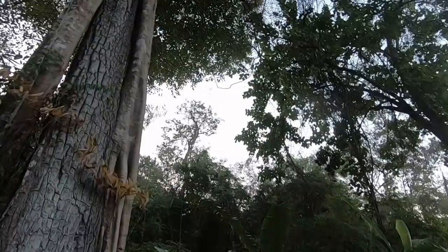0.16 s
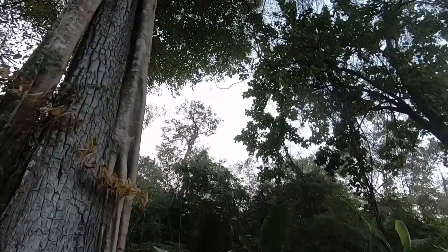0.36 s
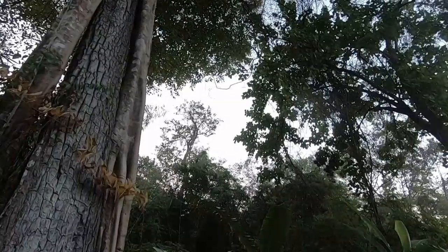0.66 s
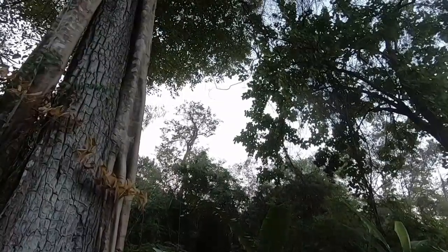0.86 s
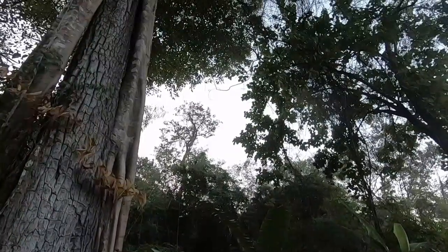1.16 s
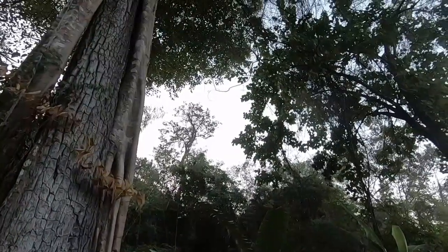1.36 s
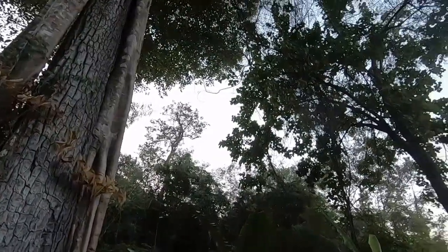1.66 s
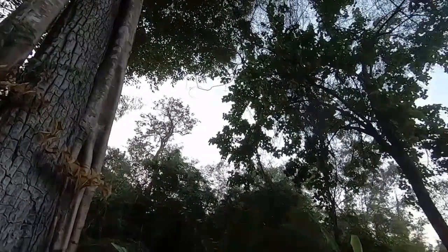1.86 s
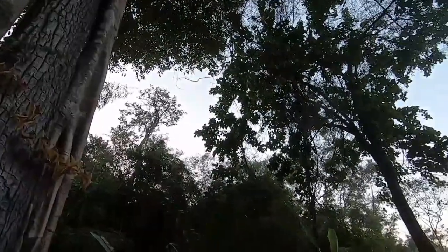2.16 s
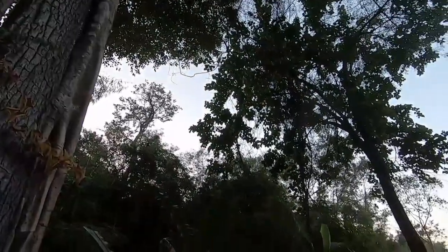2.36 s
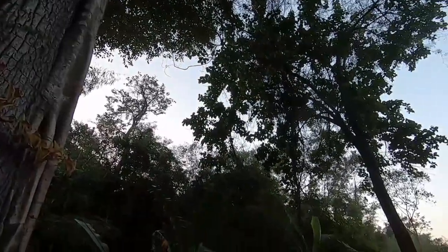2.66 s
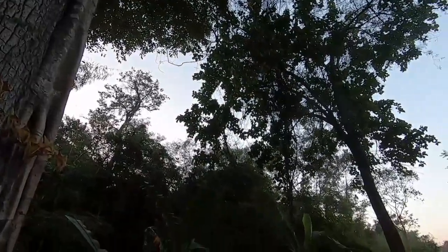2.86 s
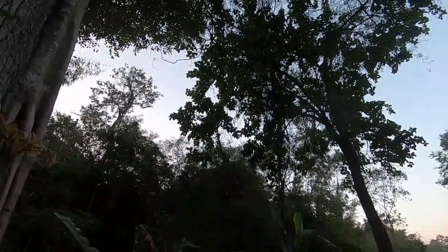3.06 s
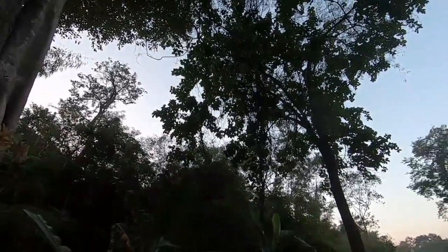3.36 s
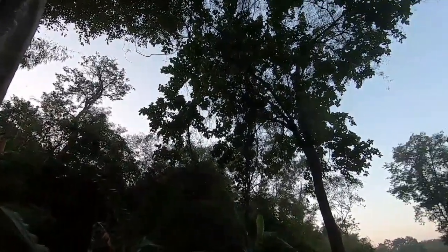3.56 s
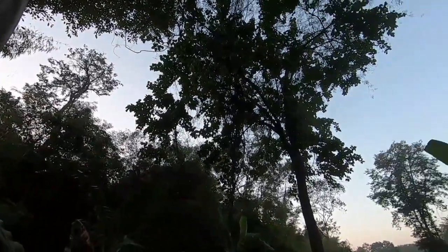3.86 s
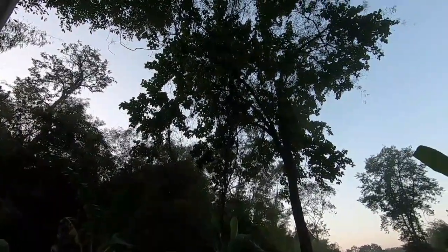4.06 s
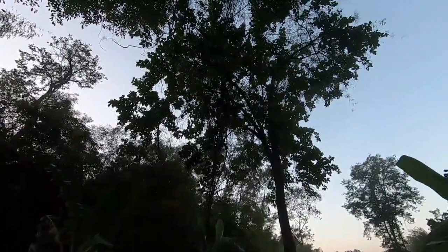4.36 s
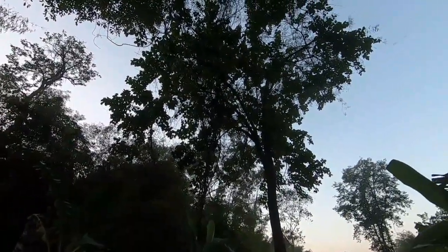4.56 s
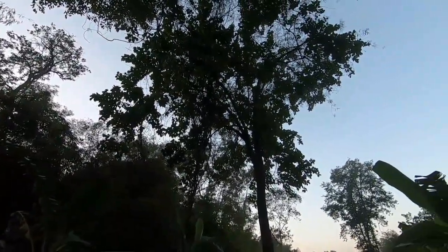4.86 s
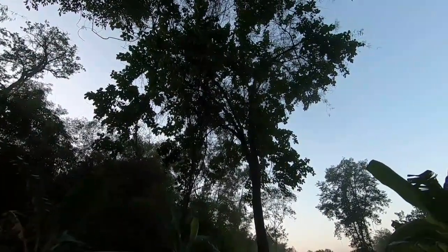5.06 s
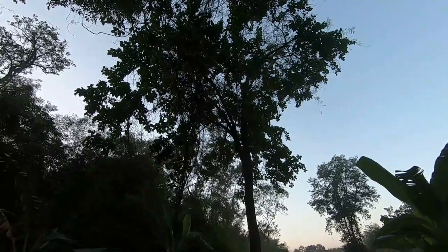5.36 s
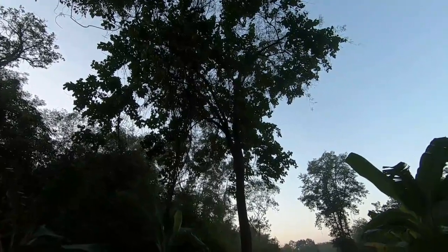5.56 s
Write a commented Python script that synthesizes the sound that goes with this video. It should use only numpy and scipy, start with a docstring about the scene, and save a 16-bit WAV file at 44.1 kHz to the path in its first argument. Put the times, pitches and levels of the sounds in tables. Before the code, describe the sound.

Small birds trade short, high, rising chirps in a forest at dawn, with an occasional sharp falling chip. The calls ring briefly among the trees over a faint bed of distant birds and insects. Later a songbird adds quick slurred whistles, mostly on the left. Fingers rub and bump the hand-held microphone, softly at first, then with a few loud low thumps near the end. The sound widens from mono to stereo halfway through.

```python
"""Small birds trade rising chirps and sharp falling chips in a forest at dawn, heard from among the trees.
A songbird whistles, mostly on the left, and something hoots far off. Trunks and leaves scatter every call
over a bed of distant birds, insects and moving air. The microphone is on a hand-held camera: fingers rub
and bump its body. The stereo image opens halfway through."""
import sys
import numpy as np
from scipy import signal
from scipy.fft import rfft, irfft, next_fast_len
from scipy.io import wavfile
from scipy.ndimage import uniform_filter1d, map_coordinates

SR = 44100
rng = np.random.default_rng(int(sys.argv[2]) if len(sys.argv) > 2 else 0)


def to_wav(s):
    """Save 16-bit WAV."""
    ch = np.atleast_2d(s).T  # columns
    pcm = np.round(np.clip(ch, -1, 1) * 32767)  # PCM
    wavfile.write(sys.argv[1], SR, pcm.astype(np.int16))


N = 251590

# the scoop of a chirp: time from its middle/lengths, pitch ratio at full sweep, level/dB
SCOOP = [(-.44, .91, -26), (-.32, .87, -11), (-.16, .90, -4), (0, 1, 0), (.16, 1.08, -1), (.32, 1.135, -8),
         (.46, 1.16, -28)]


def amp(db):
    """Decibels to gain."""
    return 10 ** (np.asarray(db) / 20)


def unit(x):
    """Scaled to rms 1."""
    return x / np.sqrt(np.mean(x ** 2) + 1e-20)


def along(points, hz):
    """(f/Hz, value) points read on a log axis."""
    f, v = np.transpose(points)
    return np.interp(np.log(hz + 1), np.log(f + 1), v)


def curve(points):
    """(t/s, value) points joined into one value per sample."""
    return np.interp(np.arange(N) / SR, *np.transpose(points))


def wobble(rate, size=N):
    """A smooth random curve, rate knots a second."""
    knots = rng.standard_normal(int(size * rate / SR) + 4)
    return map_coordinates(knots, [np.arange(size) * rate / SR])


def filtered(x, response):
    """x through a gain that depends on frequency."""
    m = next_fast_len(N + SR // 2)
    return irfft(rfft(x, m) * response(np.fft.rfftfreq(m, 1 / SR)), m)[..., :N]


def add(track, s, sound, pan_db=0):
    """Mix a sound into a stereo track at time s; positive pan is left."""
    start = int(np.clip(round(s * SR), 0, N))
    part = sound[..., :N - start]
    track[:, start:start + part.shape[-1]] += part * amp([[pan_db / 2], [-pan_db / 2]])


def spread(pair, side_db):
    """Two unrelated signals become the middle and the side of a stereo one."""
    side = amp(side_db) * pair[1]
    return np.array([pair[0] + side, pair[0] - side])


def rush(spectrum, side_db, patchy_db):
    """Stereo noise with patches of random gain; its middle has an rms near 1."""
    z = signal.stft(rng.standard_normal((2, N)), nperseg=512)[2]
    patches = uniform_filter1d(rng.standard_normal(z.shape[1:]), size=4, axis=0)
    patches = uniform_filter1d(patches, size=10, axis=1)
    pair = signal.istft(z * amp(patchy_db * unit(patches)), nperseg=512)[1][:, :N]
    return spread(unit(filtered(pair, lambda hz: amp(along(spectrum, hz)))), side_db)


def syrinx(rows, waver, overtone_db=-44, flutter_db=2):
    """A bird's voice: a nearly pure, slightly unsteady tone through (t/s, f/Hz, level/dB) points."""
    s, hz, db = np.transpose(rows)
    t = np.arange(s[0], max(s[-1], s[0] + .005), 1 / SR)
    glide = uniform_filter1d(np.interp(t, s, hz), size=200)
    pitch = glide * (1 + waver * wobble(303, size=SR)[:len(t)])
    phase = 2 * np.pi * np.cumsum(pitch) / SR
    ends = np.clip(np.minimum(t - t[0], t[-1] - t) / 0.0017, 0, 1)
    level = np.interp(t, s, db) + flutter_db * wobble(179, size=SR)[:len(t)]
    return ends * amp(level) * (np.sin(phase) + amp(overtone_db) * np.sin(2 * phase))


def scatter(call, side_db=-6, near_db=5, near_decay_s=0.021):
    """A call as the trees return it: a burst from near trunks, then a long tail, new for each perch."""
    # reverberation among the trees: f/Hz, t60/s
    decay_times = [(500, 0.91), (3000, 0.8), (6000, 1), (12000, 1)]
    hz, t, z = signal.stft(rng.standard_normal((2, SR * 3 // 4)), SR, nperseg=256)
    swell = (1 - np.exp(-t / 0.01)) * (1 + amp(near_db) * np.exp(-t / near_decay_s))
    decay = amp(-60 * t / along(decay_times, hz)[:, None])
    tail = signal.istft(z * swell * decay, SR, nperseg=256)[1]
    return signal.fftconvolve(call[None], spread(tail / np.linalg.norm(tail[0]), side_db), axes=1)


def forest(flock_chirps=60, trim_db=-1):
    """The bed all around: a far flock blurs into a chorus, over moving air, insects and hissing leaves."""
    # spectrum of each layer: f/Hz, level/dB
    chorus_spectrum = [(1300, -32.5), (1750, -14.5), (2300, -9), (2700, 3), (3050, 2.5), (3500, 0.5),
                       (4100, -12), (5000, -44)]
    air_spectrum = [(120, -9), (220, 4), (350, -2.5), (560, -8), (780, 0), (1050, -13), (1400, -9.5),
                    (1900, -7), (2600, -8), (4000, -41.5)]
    insect_spectrum = [(3000, -24), (4200, 6.5), (5200, 0.5), (6300, -2), (7200, -8), (9000, -41)]
    leaf_spectrum = [(4000, -9), (7500, 3.5), (10000, -3.5), (13000, -10), (15000, -24.5)]
    # rise and fall of each layer: t/s, level/dB
    chorus_level = [(.25, -61), (.62, -70), (.8, -59), (1.3, -55), (2.0, -54.5), (2.45, -58), (2.75, -54),
                    (3.0, -55), (3.22, -66.5), (3.95, -73.5), (4.4, -60), (5.7, -55.5)]
    air_level = [(.3, -69.5), (1.5, -67), (2.5, -67), (3.3, -72), (4.0, -72), (5.0, -69), (5.7, -72.5)]
    insect_level = [(.25, -69.5), (.75, -73.5), (1.25, -70), (2.3, -77), (3.0, -72), (3.6, -76), (5.7, -73)]
    leaf_level = [(.3, -94), (.7, -84), (1.6, -81.5), (3.6, -85), (5.7, -84.5)]
    flock = np.zeros((2, N))
    for when, pitch, length, strength in rng.random((flock_chirps, 4)):
        call = chirp(hz=2800 + 500 * pitch, length=.03 + 0.0331 * length)
        add(flock, when * N / SR, amp(3.1 * strength) * call)
    far_flock = amp(-7) * unit(scatter(flock[0])[:, :N])
    murmur = amp(-4) * rush(chorus_spectrum, side_db=-8.5, patchy_db=2.5)
    chorus = amp(curve(chorus_level)) * (far_flock + murmur)
    air = amp(curve(air_level)) * rush(air_spectrum, side_db=7.5, patchy_db=2)
    drift_db = -1.3 * wobble(2.96)
    insects = amp(curve(insect_level) + drift_db) * rush(insect_spectrum, side_db=-1.5, patchy_db=2.5)
    leaves = amp(curve(leaf_level)) * rush(leaf_spectrum, side_db=0.5, patchy_db=1)
    return chorus + amp(trim_db) * (air + insects + leaves)


def hooter(direct_db=-5, scattered_db=-7):
    """Long hoots that lift and then sink, deep in the forest."""
    # one list of points per hoot: t/s, f/Hz, level/dB
    hoots = [
        [(.61, 846, -75), (.66, 880, -65), (.72, 845, -67), (.78, 825, -68)],
        [(.93, 710, -63), (.98, 825, -67), (1.12, 856, -72), (1.25, 779, -64), (1.36, 730, -81),
         (1.46, 648, -65)],
        [(1.81, 737, -74), (1.87, 783, -58), (1.96, 733, -71), (2.08, 640, -70)],
    ]
    out = np.zeros((2, N))
    for points in hoots:
        start = points[0][0]
        call = syrinx(points, waver=0.018)
        add(out, start, amp(direct_db) * call)
        add(out, start, amp(scattered_db) * scatter(call))
    return out


def far_birds(gain_db=-2, slur=0.1004):
    """Hoarse low notes and thin high ones, slurred upward, reach the microphone only through the trees."""
    # distant notes: t/s, f/Hz, length/s, level/dB
    notes = [(0.396, 2014, 0.048, -59), (2.631, 1755, 0.067, -64), (3.596, 1610, 0.044, -69),
             (3.837, 1635, 0.051, -62.5), (3.888, 2024, 0.035, -62.5), (3.942, 1690, 0.027, -60),
             (3.92, 6050, 0.044, -66), (4.145, 6070, 0.045, -60), (4.172, 1860, 0.022, -56.5),
             (4.399, 6180, .03, -62)]
    out = np.zeros((2, N))
    for s, hz, length, db in notes:
        points = [(0, hz * (1 - slur), -8), (length / 2, hz, 0), (length, hz * (1 + slur), -8)]
        add(out, s, amp(db + gain_db) * scatter(syrinx(points, waver=.06), side_db=-2))
    return out


def brushes(gain_db=-2):
    """Skin and sleeve brush the camera, right at the microphone: short swells of dry friction noise."""
    # touches: t/s, level/dB, swell/s
    touches = [(.345, -57, 0.012), (0.851, -54, 0.0035), (.87, -64, 0.013), (1.449, -51.5, 0.0035),
               (1.599, -57, 0.014), (3.476, -58, 0.008), (3.506, -59.5, 0.0065), (4.972, -52, 0.011)]
    # friction spectrum: f/Hz, level/dB
    spectrum = [(300, -13.5), (1600, -4.5), (4200, 5), (5800, -14.5), (8000, -26.5), (11000, -36.5),
                (15000, -52)]
    t = np.arange(N) / SR
    level = np.zeros(N)
    for s, db, swell in touches:
        age = np.maximum(t - s, 0) / swell
        level += amp(db + gain_db) * age * np.exp(1 - age)
    return level * rush(spectrum, side_db=-6.5, patchy_db=5)


def grip(attack_s=.018, release_s=.04):
    """The hand sways and rubs the camera: a low rumble that swells with each shift of grip."""
    # slow sway of the held camera: t/s, level/dB
    swaying = [(.4, -68.5), (1.1, -62.5), (3.0, -60.5), (3.8, -53), (5.7, -47)]
    # shifts of grip: t/s, length/s, rub level/dB, sway level/dB
    shifts = [(0.333, 0.059, -61, -72), (0.765, 0.15, -63, -49), (1.18, .65, -54.5, -56.5),
              (2.1, .07, -56, -57), (2.455, .25, -59.5, -60), (3.201, 0.69, -62.5, -44),
              (3.4, .12, -49.5, -47), (4.192, .14, -54.5, -59), (4.435, 0.053, -47, -43),
              (4.925, .08, -42.5, -37), (5.24, 0.087, -71, -38.5), (5.495, .1, -49, -43)]
    # spectra of swaying and rubbing: f/Hz, level/dB
    sway_spectrum = [(8, -0.5), (22, 4), (40, -0.5), (70, -16.5), (130, -40), (250, -87)]
    rub_spectrum = [(50, -13), (110, -7), (185, 2.5), (240, -12.5), (400, -27), (900, -62.5)]
    sway, rub = amp(curve(swaying) - 1.5), amp(-67.5)  # the hand between shifts
    for s, length, rub_db, sway_db in shifts:
        age = np.arange(N) / SR - s
        effort = np.clip(age / attack_s, 0, 1) * np.exp(-np.maximum(age - length, 0) / release_s)
        sway = np.hypot(sway, amp(sway_db) * effort)
        rub = np.hypot(rub, amp(rub_db) * effort)
    rumble = sway * rush(sway_spectrum, side_db=-14.5, patchy_db=3)
    return rumble + rub * amp(-3) * rush(rub_spectrum, side_db=0.5, patchy_db=4)


def thud(hz, swell_s, stiffening=0.81, contact_s=0.0029):
    """The camera body rocks briefly against the hand, faster during the first hard contact."""
    t = np.arange(SR // 4) / SR
    cycles = hz * (t + stiffening * contact_s * (1 - np.exp(-t / contact_s)))
    return -np.sin(2 * np.pi * cycles) * (t / swell_s * np.exp(1 - t / swell_s)) ** 1.64


def fingers(thud_db=-3, tick_s=0.0019, scuff_db=-16, scuff_s=0.021, port_lag_s=0.00091):
    """Fingers knock on the camera: a bump is a thud, a tick and a scuff of skin; a judder only thuds."""
    # bumps on the body: t/s, level/dB, f/Hz, tick level/dB
    bumps = [(.856, -40, 112, -68), (.886, -42.5, 89, -54.5), (1.449, -41, 101, -68),
             (1.602, -39.5, 117, -55), (3.204, -34.5, 31.6, -72), (3.426, -22.5, 71.5, -53.5),
             (3.478, -42, 108, -55), (3.502, -37.5, 96, -58.5), (3.594, -27, 67, -63),
             (3.612, -25, 84, -74), (4.163, -39.5, 54.6, -80), (4.442, -39, 128, -64),
             (4.730, -37, 145.6, -57), (4.961, -6.5, 61, -37), (4.979, -15, 50, -43), (4.995, -13, 65, -49),
             (5.1477, -8, 62.3, -33.5), (5.494, -14, 56.4, -39.5), (5.514, -18, 43.5, -54)]
    # a finger chatters on the case: t/s, level/dB, f/Hz
    judders = [(1.189, -43, 162), (1.258, -42.5, 147), (1.312, -48, 159), (1.37, -42.5, 167.7),
               (1.485, -48, 156), (1.645, -45, 177), (1.782, -45.5, 184), (2.60, -49.5, 186),
               (4.291, -35.5, 161)]
    # spectrum of tick and scuff: f/Hz, level/dB
    tick_spectrum = [(80, 10), (220, 19.5), (500, 5), (850, 3.5), (1050, -16.5), (2600, -4), (4200, -12.5),
                     (6500, -7), (9500, -25), (12000, -33), (15000, -49)]
    thuds, ticks = np.zeros((2, N)), np.zeros((2, N))
    t = np.arange(SR // 6) / SR
    touch = t / tick_s * np.exp(1 - t / tick_s) + amp(scuff_db) * np.exp(-t / scuff_s)
    for s, db, hz, tick_db in bumps:
        right = amp(db + thud_db) * thud(hz, swell_s=0.0085)
        left = np.roll(right, round(port_lag_s * SR))  # the push reaches the right microphone port first
        add(thuds, s, np.array([left, right]), pan_db=-3.5)
        add(ticks, s, amp(tick_db) * touch * spread(rng.standard_normal((2, len(t))), side_db=5))
    for s, db, hz in judders:
        add(thuds, s, amp(db + thud_db) * thud(hz, swell_s=0.015), pan_db=-7)
    return thuds + filtered(ticks, lambda hz: amp(along(tick_spectrum, hz) + 1.5))


def whistle(length, first_hz, last_hz, bend, rise_share=0.46, fall_share=0.39, edge_db=-11):
    """One note swells and fades as its pitch slides: evenly at bend 1, arriving early above that."""
    u = np.linspace(0, 1, 24)
    hz = last_hz + (first_hz - last_hz) * (1 - u) ** bend
    db = edge_db * np.clip(np.maximum(1 - u / rise_share, 1 - (1 - u) / fall_share), 0, 1)
    return syrinx(np.column_stack([u * length, hz, db]), waver=.0078, flutter_db=0)


def songbird(direct_db=-5, scattered_db=-4, echo_db=-13, trunks=4):
    """Slurred whistles, mostly from the left, echo off a few trunks and hang among the trees."""
    # whistled notes: t/s, length/s, first f/Hz, last f/Hz, level/dB, bend, pan/dB
    notes = [(.250, 0.029, 2354, 2343, -54.5, 2, -13), (0.281, 0.023, 2402, 2950, -48, 1.02, -18),
             (.392, 0.018, 2720, 2583, -49.5, 2.2, -15), (4.128, 0.071, 2780, 2354, -47.5, 3.2, -2),
             (4.207, 0.0673, 2456, 2785, -44.5, 5.8, 1), (4.380, 0.046, 1680, 1970, -54, 1.13, 12),
             (4.415, .050, 1997, 3308, -37.5, 1.3, 3.5), (4.466, 0.044, 3280, 2423, -38, 1.13, 3.5),
             (4.575, .045, 2314, 2109, -49.5, 3, 10), (4.632, 0.061, 3250, 3770, -45.5, 1.82, 3.5),
             (4.695, 0.07, 3500, 2350, -51.5, 3.5, 6), (5.232, 0.07, 2004, 2410, -44.5, 5.6, 10),
             (5.388, 0.05, 2700, 3500, -51, 2.7, 7), (5.419, 0.06, 2846, 2781, -38.5, 2.5, 8),
             (5.508, 0.034, 2790, 2784, -41.5, 1, 11), (5.524, 0.023, 2062, 2270, -45, 1, 7),
             (5.543, 0.024, 2240, 2907, -38.5, 1.16, 5.5), (5.572, .036, 2880, 2960, -40, 1, 5.5),
             (5.607, 0.044, 2980, 3544, -34, 4.9, 7)]
    out = np.zeros((2, N))
    for s, length, first_hz, last_hz, db, bend, pan_db in notes:
        call = amp(db) * whistle(length, first_hz, last_hz, bend)
        add(out, s, amp(direct_db) * call, pan_db)
        add(out, s, amp(scattered_db) * scatter(call, side_db=-4.5), pan_db / 2)
        for delay in rng.uniform(0.014, 0.1, trunks):
            add(out, s + delay, amp(direct_db + echo_db) * call, pan_db)
    return out


def chippers(lisp_hz=5320, rasp_hz=6150, lead_s=0.012):
    """Each chip opens with a thin rough lisp and drops steeply; far birds arrive mostly scattered."""
    # falling chips: t/s, top f/Hz, end f/Hz, direct level/dB, scattered level/dB, lisp level/dB, pan/dB
    chips = [(.345, 4740, 3420, -66, -63, -10, 0), (1.130, 4820, 3396, -48, -44, -15, -2),
             (1.745, 4114, 3205, -45, -44, -24, 13), (2.815, 4390, 3350, -33, -36, -10.5, 5.5),
             (2.868, 5100, 4220, -44.5, -44, -16, -4), (3.352, 4500, 3380, -52.5, -46.5, -10.5, -1),
             (3.692, 4545, 3415, -61, -46.5, -13.5, 5), (4.124, 4520, 3300, -57, -46, -11, 0),
             (4.886, 4606, 3220, -30, -36.5, -9.5, 4.5), (5.473, 4760, 2970, -40.5, -41.5, -17, 3)]
    # the downstroke of a chip: t/s, share of the fall still to come, level/dB
    stroke = [(0, 0.97, -18.5), (.004, 0.661, -14.5), (.010, .36, -6), (.018, .15, -4.5), (0.024, .03, -6),
              (0.03, 0.055, -14)]
    out = np.zeros((2, N))
    lisp_points = [(0, lisp_hz, -2), (.008, lisp_hz, -11), (.018, lisp_hz, -1), (.028, lisp_hz, -8.5)]
    for s, top_hz, end_hz, direct_db, scattered_db, lisp_db, pan_db in chips:
        fall_points = [(t, end_hz + share * (top_hz - end_hz), db) for t, share, db in stroke]
        rasp_points = [(0, rasp_hz, -1.5), (.014, lisp_hz, -5), (.026, top_hz, -2), (.042, end_hz, 3.5)]
        fall = syrinx(fall_points, waver=0.018)
        lisp = amp(lisp_db - 8) * syrinx(lisp_points, waver=.007)
        rasp = amp(lisp_db - 2) * syrinx(rasp_points, waver=0.085)
        for start, part, trim_db in (s, fall, 0), (s - lead_s, lisp, 0), (s - lead_s, rasp, -7):
            add(out, start, amp(direct_db + trim_db) * part, pan_db)
            add(out, start, amp(scattered_db) * scatter(part))
    return out


def chirp(hz, length, full_sweep_s=0.05094):
    """One scooped, rising syllable; shorter ones sweep less far."""
    sweep = min(length / full_sweep_s, 1) ** 1.44
    return syrinx([(t * length, hz * ratio ** sweep, db) for t, ratio, db in SCOOP], waver=0.019)


def chirpers(gain_db=-6.5, length_s=.05, half_scattered_m=20.5):
    """Small birds in the crowns, 9 to 41 m off, trade chirps; the farther, the more is scattered."""
    # rising chirps: middle t/s, level/dB, middle f/Hz, distance/m
    chirps = [(.707, -44, 3020, 17), (.757, -48, 3090, 24), (.843, -43, 2943, 10), (.955, -51.5, 3094, 18),
              (1.047, -41, 3046, 11), (1.114, -49, 2966, 28), (1.19, -44.5, 3030, 33),
              (1.398, -44, 2957, 27), (1.472, -43.5, 3160, 25), (1.530, -44, 3040, 10),
              (1.765, -46, 3195, 10), (1.794, -44.5, 2915, 16), (1.828, -43.5, 3100, 22),
              (1.887, -42.5, 3100, 14), (2.090, -47, 3053, 27), (2.184, -45, 2997, 41),
              (2.224, -45.5, 3260, 27), (2.378, -42, 3000, 17), (2.456, -47, 2944, 13),
              (2.611, -38.5, 3103, 17), (2.675, -43.5, 3040, 25), (2.736, -44.5, 3130, 26),
              (2.783, -44, 3114, 23), (2.967, -36, 3180, 13.4), (3.040, -44, 3010, 21),
              (3.164, -41.5, 3015, 13.4), (3.538, -38.5, 3086, 9), (3.944, -52.5, 3045, 22),
              (4.077, -49.5, 3040, 28), (4.391, -43.5, 3054, 20), (4.807, -49, 3065, 15),
              (5.047, -43.5, 2870, 23)]
    out = np.zeros((2, N))
    for s, db, hz, distance in chirps:
        call = amp(db + gain_db) * chirp(hz, length_s)
        start = s + SCOOP[0][0] * length_s
        add(out, start, call)
        add(out, start, distance / half_scattered_m * scatter(call, side_db=-7))
    return out


def scene():
    """Birds, forest and the hand on the camera, as they meet at the microphone."""
    birds = chirpers() + chippers() + songbird() + far_birds() + hooter()
    return birds + forest() + grip() + fingers() + brushes()


def record(dry, top_hz=15400):
    """The camera fades in, opens from mono to stereo and keeps nothing above its band limit."""
    # stereo width: t/s, share of the side signal
    width = [(0, 0), (2.6, 0.004), (3.3, 0.76), (4.3, 1), (5.7, 1)]
    # opening fade: t/s, level/dB
    fade_in = [(0, -94.5), (.175, -35), (.205, -5.5), (.27, 5)]
    mid = (dry[0] + dry[1]) / 2
    side = (dry[0] - dry[1]) / 2 * curve(width)
    faded = np.array([mid + side, mid - side]) * amp(curve(fade_in))
    return filtered(faded, lambda hz: hz < top_hz)


dry = scene()
out = record(dry)
to_wav(out)
```